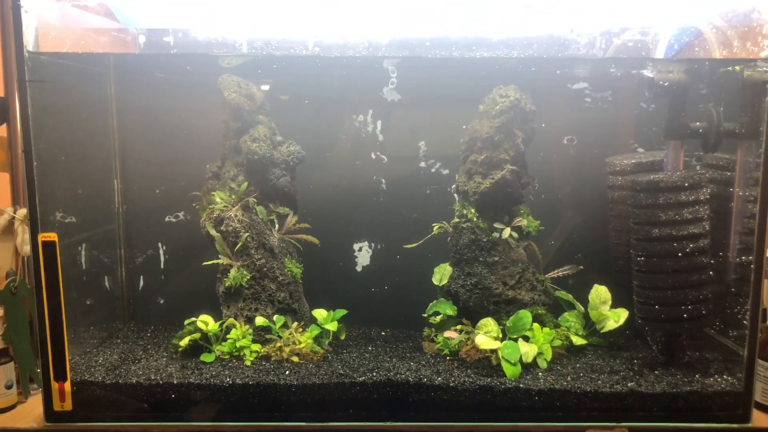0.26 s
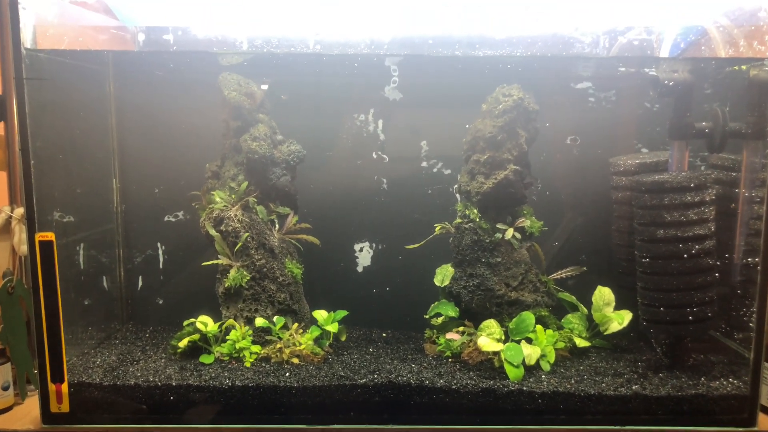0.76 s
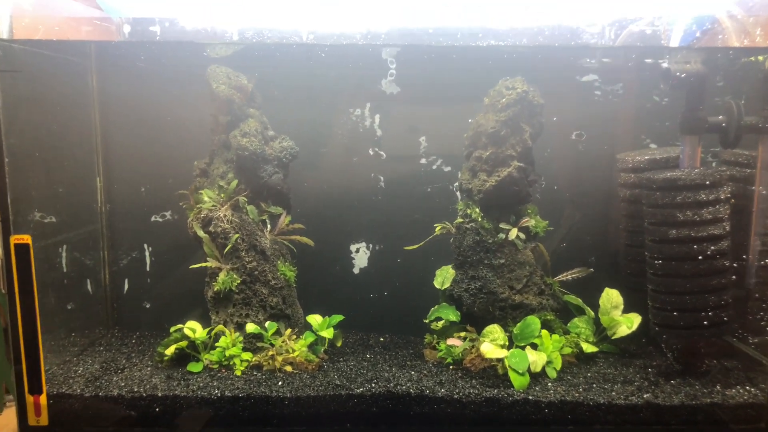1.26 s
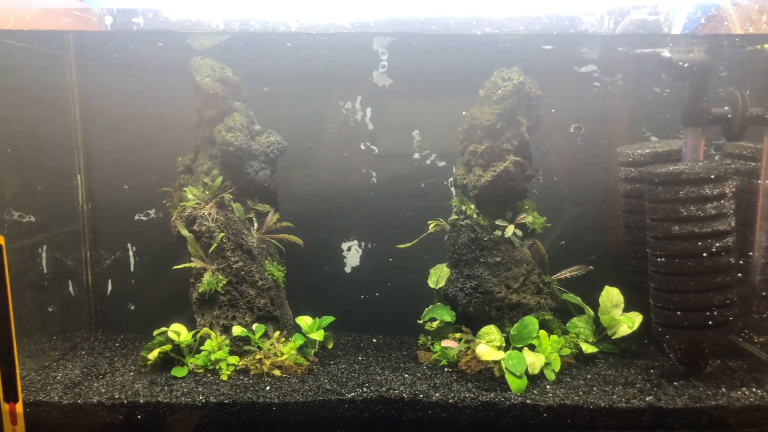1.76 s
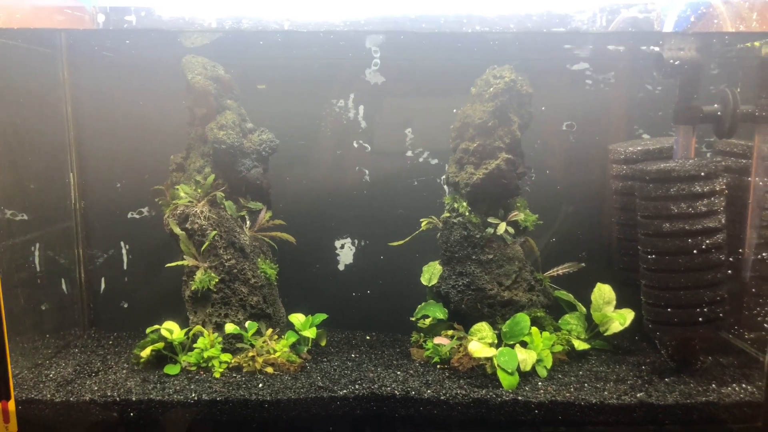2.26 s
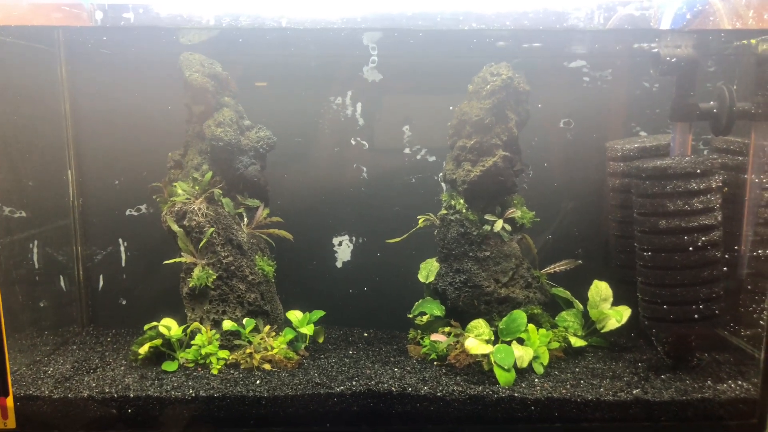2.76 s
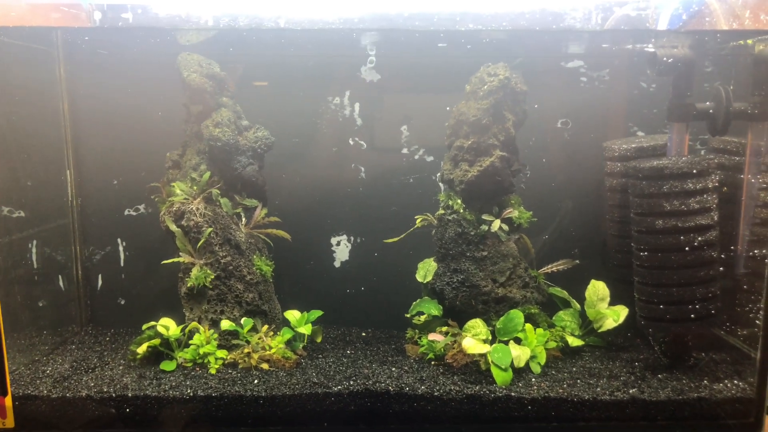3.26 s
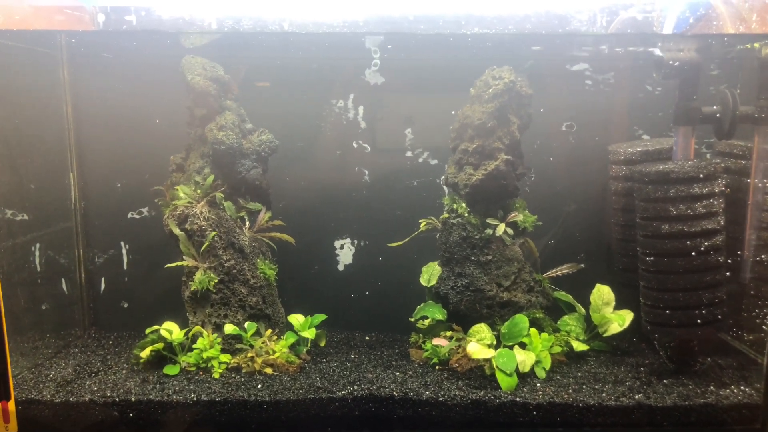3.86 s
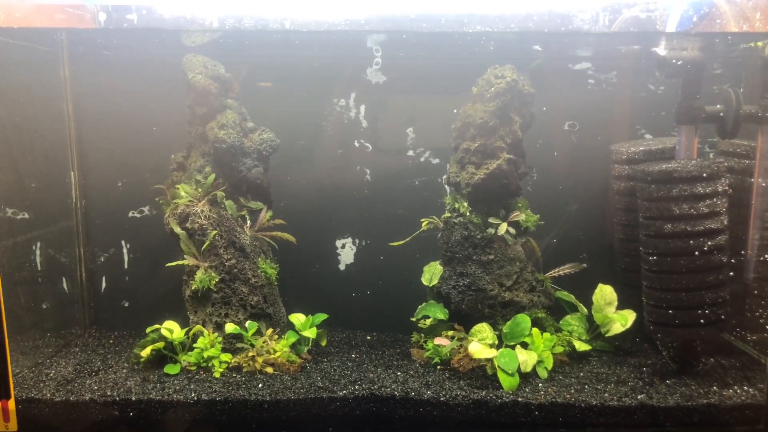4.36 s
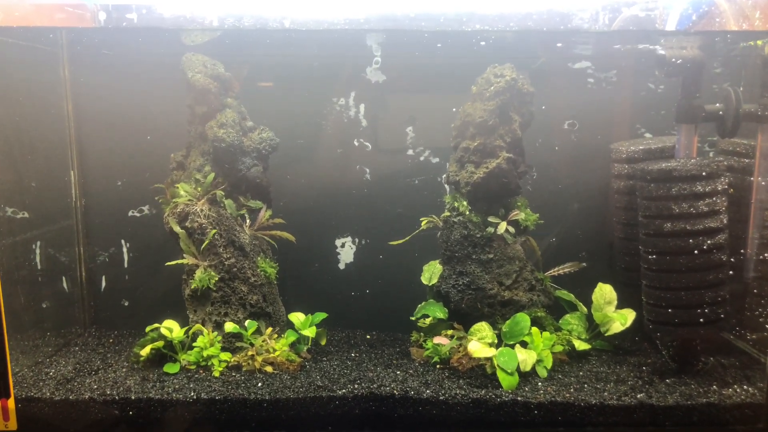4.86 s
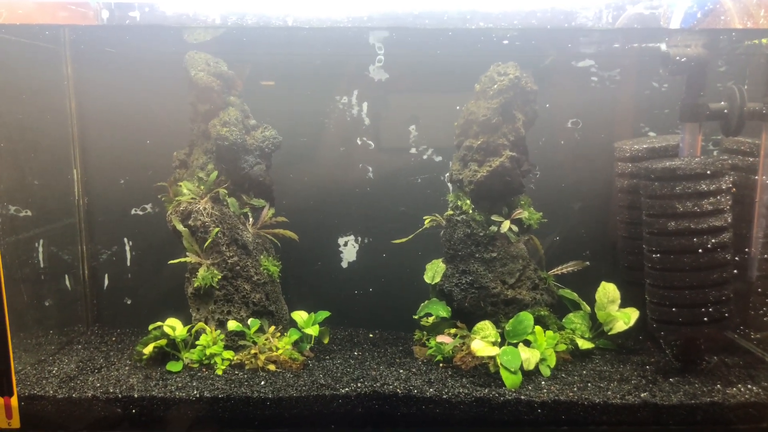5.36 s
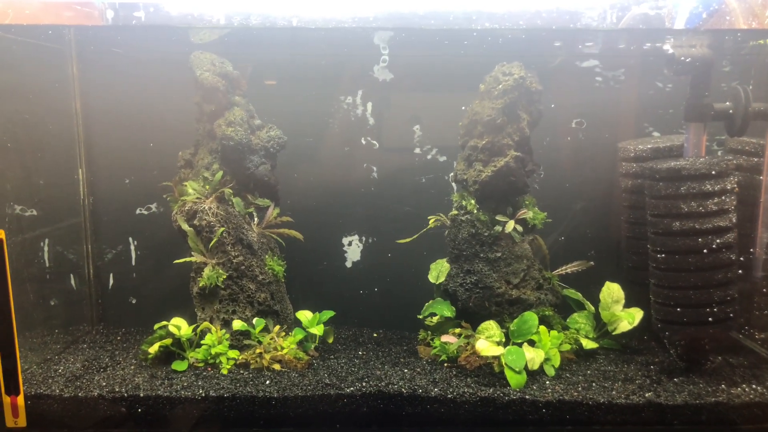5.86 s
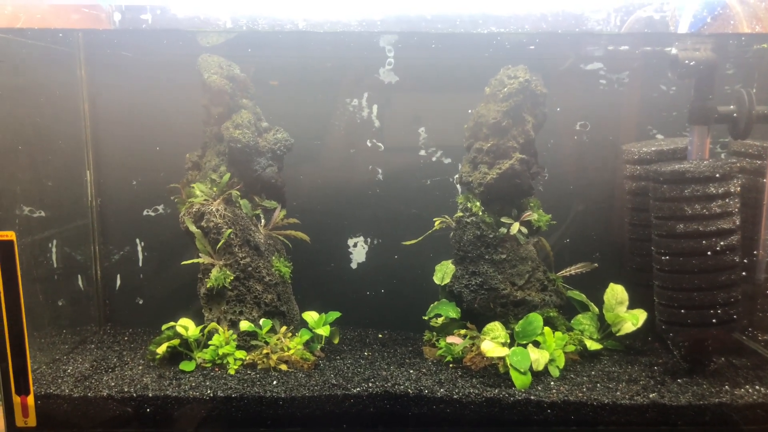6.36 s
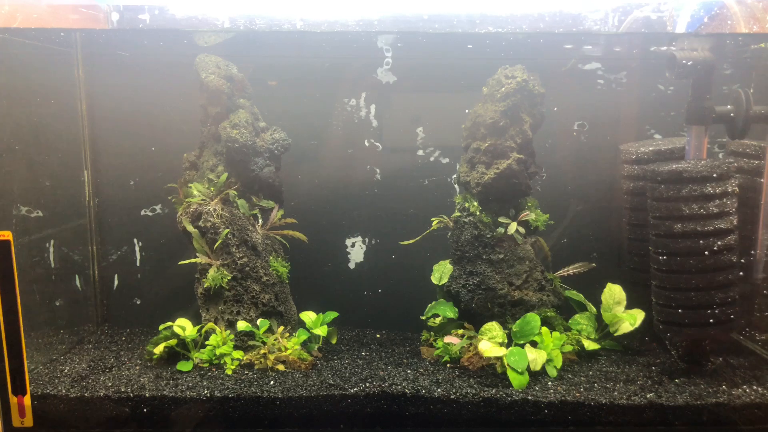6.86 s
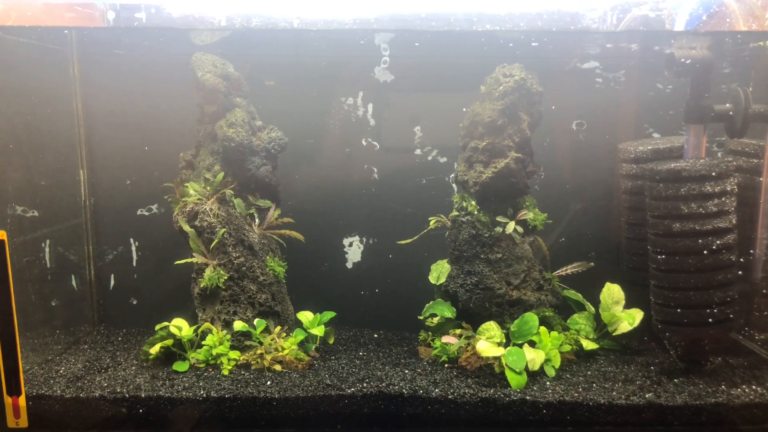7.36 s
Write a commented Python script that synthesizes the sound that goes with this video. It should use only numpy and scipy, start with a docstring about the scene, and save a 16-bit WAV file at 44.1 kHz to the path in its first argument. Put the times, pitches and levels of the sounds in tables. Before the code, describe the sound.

A steady low electric hum with a faint buzzing rasp from an aquarium air pump, with soft bubble ticks and light handling taps.

```python
"""A quiet room with an aquarium: a hand-held camera moves from further back up to the tank.
The air pump hums as its diaphragm strokes once per mains cycle; its valves buzz and a loose part chatters.
Tiny bubbles burst at the water surface as short, high noise pings over an even fizz.
Fingers tap the camera's case, ringing its damped modes, and rub it with a low rumble of shaped noise.
Low room noise lies underneath, and the camera cuts the extreme treble."""
import sys
import numpy as np
from scipy.fft import rfft, irfft, next_fast_len
from scipy.io import wavfile
from scipy.ndimage import map_coordinates

SR = 44100
rng = np.random.default_rng(int(sys.argv[2]) if len(sys.argv) > 2 else 0)


def wrap_up_sound(samples):
    """Save the sound to the file named by the first command line argument, as 16-bit audio."""
    columns = np.atleast_2d(samples).T
    # keep every value between -1 and 1, then stretch to whole-number steps
    tamed = np.clip(columns, -1, 1)
    steps = np.round(tamed * 32767).astype(np.int16)
    wavfile.write(sys.argv[1], SR, steps)


N = 335601

MAINS_HZ, STROKE_S = 50.008, .01673  # stroke rate; time of one main stroke
MOVE_START_S, MOVE_END_S = 0.71, 1.9  # the camera moves up to the tank
# The pump's hum close to the tank. Each row: multiple of the stroke rate, level in dB.
HUM_PARTIALS = [(1, -61.5), (2, -67.0), (3, -59), (4, -56.4), (5, -55.5), (6, -56.5), (7, -61), (8, -57.5),
                (9, -69), (10, -75), (11, -69.0), (12, -66.5), (13, -70), (14, -68.5), (15, -77),
                (16, -77.5), (17, -80.5), (18, -93.5), (19, -69.5), (20, -66.5), (21, -77.5), (22, -80),
                (23, -80.5), (24, -75.0), (25, -89), (26, -77.4), (27, -83), (28, -76.5), (29, -76.5),
                (30, -78), (31, -74.4), (32, -73.5), (33, -79.6), (34, -83.5), (35, -77), (36, -79),
                (37, -77.5), (38, -82.5), (39, -81), (40, -97)]
# Strength of the diaphragm's back stroke. Each row: frequency in Hz, share of the main stroke.
BACK_STROKE = [(250, 0.27), (700, 0.41), (2000, 0.74)]
# Spread of the partials' arrival through the room. Each row: frequency in Hz, phase spread in radians.
ROOM_SCATTER = [(420, 0.24), (530, 2.365), (780, 1.46), (950, 0.93), (2000, 0.83)]
# How the room colours the hum at the further place. Each row: frequency in Hz, level change in dB.
FAR_COLOUR_CURVE = [(700, -0.64), (800, 8), (870, 7), (950, -2.5), (1000, 0), (1050, -6), (1130, -7),
                    (1250, -16), (1350, -3), (1500, 3.5), (1650, -6.5), (1800, -2)]
# Thin upper buzz of the valves. Each row: frequency in Hz, level per line in dB before the overall gain.
VALVE_BUZZ = [(2000, -91.5), (2700, -93), (3400, -96.5), (4000, -96), (5000, -100), (6500, -100),
              (7500, -110)]
# Colour of the loose part's rasp. Each row: frequency in Hz, relative level in dB.
CHATTER_COLOUR = [(750, -43), (950, 3), (1100, 13.5), (1250, 2), (1500, -27)]
# Flares of the loose part. Each row: time at the strongest in seconds, dB above its usual level.
CHATTER_FLARES = [(2.65, 2), (4.57, 6), (5.58, 4), (6.1, 4.5)]
CHATTER_DB, FLARE_S = -74.3, 0.094  # usual level; half the length of a flare
# The louder bursting bubbles. Each row: start in seconds, peak in dB before the overall gain, pitch in Hz.
BUBBLE_BURSTS = [(.2228, -49.5, 12900), (.545, -54.5, 5050), (.9696, -48, 13000), (1.283, -44.5, 9000),
                 (1.7912, -50, 14000), (2.0197, -52, 13800), (2.7135, -46, 11300), (2.8947, -52, 13600),
                 (3.195, -54, 6900), (3.8301, -52.5, 11000), (4.3105, -51, 13100), (4.5066, -54.5, 10800),
                 (4.8932, -55, 12800), (4.9144, -59, 11200), (5.5861, -57, 15200), (6.0311, -49, 13200),
                 (6.6612, -44, 13900), (7.0418, -54, 14600), (7.5092, -54, 13600)]
FAINT_BUBBLES_PER_S, FAINT_BUBBLE_DB, FAINT_BUBBLE_HZ = .6, -57.5, 11500  # by chance; centre values
# The louder finger taps. Each row: start in seconds, peak in dB before the overall gain, firmness in dB.
FINGER_TAPS = [(0.145, -35.5, 10.5), (2.153, -48, -2), (2.876, -44, 2), (2.912, -49, -2), (4.504, -45, 1),
               (4.563, -48, 0), (5.358, -47, 3), (5.376, -42, -6), (5.417, -40.5, -2), (5.742, -42.5, 6.5),
               (6.112, -48, 13), (6.319, -49, -5), (7.136, -43, 6), (7.471, -47.5, 0)]
FAINT_TAPS_PER_S, FAINT_TAP_DB = .8, -52.5  # by chance; centre level before the overall gain
CLICK_DB, CLICK_PER_FIRMNESS = -2, .65  # click of a plain tap; dB more for each dB of firmness
# Resonances of the camera's case. Each row: centre in Hz, width in Hz, relative level in dB.
CASE_MODES = [(70.4, 100, 0), (220, 245, -5.5), (493, 180, 0), (671, 78, 6.5), (1150, 150, -11),
              (1580, 220, -15), (2370, 150, -20.5), (3650, 220, -28), (6600, 1000, -27.5)]
# The hand shifting its grip. Each row: time at the strongest in seconds, level in dB.
GRIP_RUBS = [(.355, -49.5), (2.25, -61)]
RUB_ATTACK_S, RUB_T60_S = 0.087, 1.2  # rise time; time to fall by 60 dB
# Colour of skin dragging on the case. Each row: frequency in Hz, relative level in dB.
SKIN_COLOUR = [(20, -5), (50, 2), (150, 4.5), (250, -2.5), (380, -14), (800, -54)]
# Fizz of fine bubbles. Each row: frequency in Hz, relative level in dB.
FIZZ_COLOUR = [(1200, -9), (2700, -3), (4100, 1), (6400, -1.5), (7500, -6.5), (8600, -5), (10000, -11),
               (13500, -12.5), (15600, -16.5)]
# Noise of the quiet room. Each row: frequency in Hz, relative level in dB.
ROOM_COLOUR = [(14, -28), (28, -3), (42, 4.5), (110, -5), (370, -3.5), (500, -10.5), (670, -9.5),
               (830, -11), (1100, -13), (1750, -16.5), (2100, -17), (2700, -25), (8000, -51)]
TOP_HZ = 15790  # the camera's upper band limit


def hum(sway_db, wander_db, beat_db):
    """A stroke and a weaker back stroke each cycle; the room scatters their higher partials."""
    t = np.arange(N) / SR
    angle, out = stroke_angle(), np.zeros(N)
    # 1 at the place further back, 0 close to the tank
    far = np.clip((MOVE_END_S - t) / (MOVE_END_S - MOVE_START_S), 0, 1)
    for order, near_db in HUM_PARTIALS:
        hz = order * MAINS_HZ
        # the back stroke comes half a cycle later, so it turns odd and even partials opposite ways
        back = -np.arctan(along(BACK_STROKE, hz)) * (-1) ** order
        scatter = along(ROOM_SCATTER, hz) * rng.standard_normal()
        # short waves change most as the hand drifts through the room's standing waves
        drift_db = sway_db + wander_db * order / len(HUM_PARTIALS)
        level = near_db + along(FAR_COLOUR_CURVE, hz) * far + drift_db * wobble(1.54)
        if order == 1:
            level = level + beat_db * wobble(2.85)  # the deepest tone swells and sinks
        recoil = -1 if order <= 2 else 1  # the housing rocks against the stroke
        out += recoil * np.sqrt(2) * amp(level) * np.cos(order * angle + back + scatter)
    return out


def buzz(gain_db, uneven_db, drift_db):
    """The valves add a comb of faint, uneven upper partials locked to the stroke."""
    orders = np.arange(len(HUM_PARTIALS) + 1, 150)
    size = 4096  # samples in one stroke cycle
    lines = np.zeros(size // 2 + 1, complex)
    unevenness = uneven_db * rng.standard_normal(len(orders))
    lines[orders] = amp(along(VALVE_BUZZ, orders * MAINS_HZ) + unevenness)
    random_phase = np.exp(2j * np.pi * rng.random(len(lines)))
    cycle = irfft(lines * random_phase) * size / np.sqrt(2)
    wave = np.interp(stroke_angle() / (2 * np.pi), np.arange(size) / size, cycle, period=1)
    return amp(gain_db + drift_db * wobble(2.03)) * wave


def chatter(depth_db):
    """A loose part makes a narrow rasp that pulses with every stroke and swells in each flare."""
    t = np.arange(N) / SR
    level = CHATTER_DB + sum(db * np.exp(-((t - s) / FLARE_S) ** 2) for s, db in CHATTER_FLARES)
    pulse = amp(depth_db * np.cos(stroke_angle()))
    return amp(level) * unit(pulse * noise(CHATTER_COLOUR))


def bubbles(gain_db, sharpness, burst_t60, echo_db, echo_t60):
    """Each burst is a very short ping, smeared by reflections between water, glass and walls."""
    out, t = np.zeros(N), np.arange(4096) / SR
    hz = np.fft.rfftfreq(len(t), 1 / SR)
    fade = amp(-60 * t / burst_t60) + amp(echo_db - 60 * t / echo_t60)
    chance = faint(FAINT_BUBBLES_PER_S, FAINT_BUBBLE_DB, FAINT_BUBBLE_HZ, spread=3000, spread_db=1)
    for s, db, pitch_hz in BUBBLE_BURSTS + chance:
        # a cavity radiates little below its own pitch
        radiation = 1 / np.sqrt(1 + (.75 * pitch_hz / (hz + 1)) ** 10)
        burst = rfft(fade * rng.standard_normal(len(t)))
        ping = irfft(burst * resonance(hz, pitch_hz, pitch_hz / sharpness) * radiation)
        add(out, s, amp(db + gain_db) * ping / np.abs(ping).max())
    return out


def taps(gain_db, lag_s, thump_hz, click_hz, vary_db):
    """A tap travels through the case as a bending wave: treble first, bass last (lag_s late at 100 Hz)."""
    out, size = np.zeros(N), 8192
    hz = np.fft.rfftfreq(size, 1 / SR)
    dispersion = np.exp(-4j * np.pi * lag_s * np.sqrt(100 * hz))
    chance = faint(FAINT_TAPS_PER_S, FAINT_TAP_DB, 0, spread=4, spread_db=0.5)
    for s, db, firm_db in FINGER_TAPS + chance:
        click_db = CLICK_DB + CLICK_PER_FIRMNESS * firm_db  # a firm tap both thumps and clicks more
        body = np.zeros(len(hz), complex)
        for k, (centre, width, level) in enumerate(CASE_MODES):
            # each touch lands on another spot and stirs the modes differently
            strength = amp(level + vary_db * rng.standard_normal())
            body += (-1) ** k * strength * resonance(hz, centre, width)
        thump = firm_db / (1 + (hz / thump_hz) ** 2)
        click = click_db * (1 - 1 / (1 + (hz / click_hz) ** 4))
        knock = irfft(body * amp(thump + click) * dispersion)
        add(out, s, amp(db + gain_db) * knock / np.abs(knock).max())
    return out


def grip():
    """Skin drags over the case in a low rumble that rises fast and dies away."""
    t, level = np.arange(N) / SR, np.zeros(N)
    for s, db in GRIP_RUBS:
        rise = np.clip(1 + (t - s) / RUB_ATTACK_S, 0, 1)
        level += amp(db - 60 * np.maximum(t - s, 0) / RUB_T60_S) * rise
    return level * noise(SKIN_COLOUR)


def background(room_db, fizz_db, swell_db):
    """Gently swelling low room noise under the even fizz of fine bubbles, both as coloured noise."""
    room = amp(room_db + swell_db * wobble(4.96)) * noise(ROOM_COLOUR)
    fizz = amp(fizz_db) * noise(FIZZ_COLOUR)
    return room + fizz


def stroke_angle():
    """Angle of the diaphragm's cycle, zero at each stroke."""
    return 2 * np.pi * MAINS_HZ * (np.arange(N) / SR - STROKE_S)


def resonance(hz, centre_hz, width_hz):
    """Response of one damped mode, 1 at its centre."""
    return 1j * hz * width_hz / (centre_hz ** 2 - hz ** 2 + 1j * hz * width_hz)


def faint(per_s, db, centre, spread, spread_db):
    """Chance events: rows (s, dB, pitch or firmness scattered about its centre)."""
    rows = []
    for when, loud, kind in rng.random((round(per_s * N / SR), 3)):
        rows.append((when * N / SR, db + spread_db * (2 * loud - 1), centre + spread * (2 * kind - 1)))
    return rows


def amp(db):
    """Amplitude factor of a level in dB."""
    return 10 ** (np.asarray(db) / 20)


def unit(x):
    """x scaled to rms 1."""
    return x / np.sqrt(np.mean(x ** 2) + 1e-20)


def along(points, hz):
    """Read a curve of (Hz, value) points on a log frequency axis."""
    f, v = np.transpose(points)
    return np.interp(np.log(hz + 1), np.log(f + 1), v)


def wobble(rate):
    """A smooth random curve, rate knots a second."""
    s = np.linspace(0, N / SR, 400)
    knots = rng.standard_normal(200)
    return np.interp(np.arange(N) / SR, s, map_coordinates(knots, [s * rate], mode="mirror"))


def filtered(x, response):
    """x times a response of frequency."""
    size = next_fast_len(N + SR // 2)
    return irfft(rfft(x, size) * response(np.fft.rfftfreq(size, 1 / SR)), size)[:N]


def noise(spectrum):
    """Coloured noise of rms 1."""
    return unit(filtered(rng.standard_normal(N), lambda hz: amp(along(spectrum, hz))))


def add(track, s, sound):
    """Mix a short sound in at s seconds."""
    part = track[max(round(s * SR), 0):][:len(sound)]
    part += sound[:len(part)]


def scene():
    """Sum the pump, the water, the hand on the camera and the room."""
    pump = hum(sway_db=-0.05, wander_db=1.4, beat_db=-3.0)
    pump += buzz(gain_db=0.5, uneven_db=3.5, drift_db=1.5)
    pump += chatter(depth_db=10.5)
    water = bubbles(gain_db=-1.5, sharpness=12.5, burst_t60=0.025, echo_db=-14.5, echo_t60=0.18)
    hand = taps(gain_db=-1, lag_s=.018, thump_hz=180, click_hz=1100, vary_db=2.5) + grip()
    room = background(room_db=-64.0, fizz_db=-69, swell_db=1.8)
    return (pump + water + hand + room)[None]


def record(dry):
    """The camera's microphone channel keeps nothing above its band limit."""
    return filtered(dry[0], lambda hz: hz < TOP_HZ)[None]


dry = scene()
out = record(dry)
wrap_up_sound(out)
```